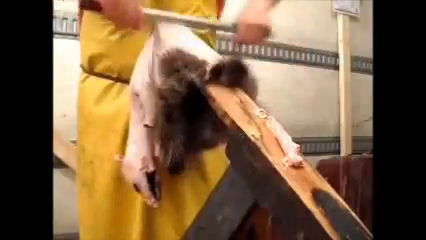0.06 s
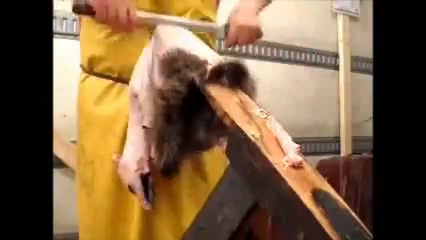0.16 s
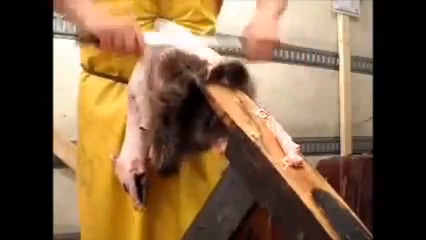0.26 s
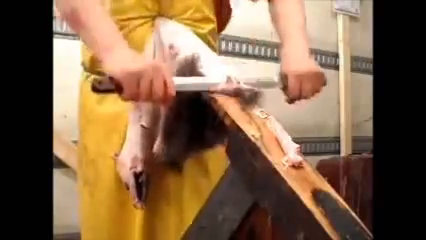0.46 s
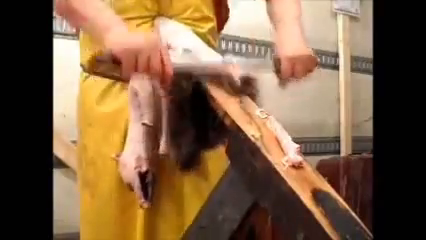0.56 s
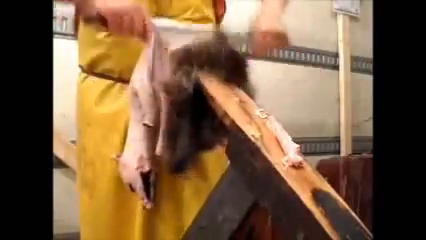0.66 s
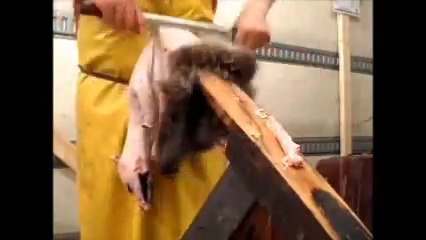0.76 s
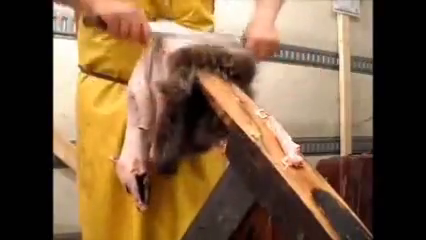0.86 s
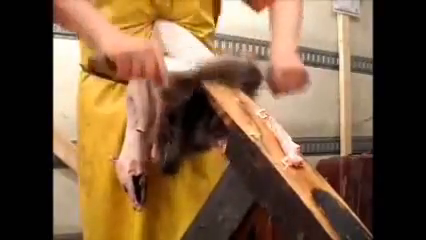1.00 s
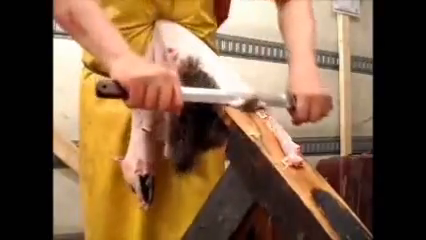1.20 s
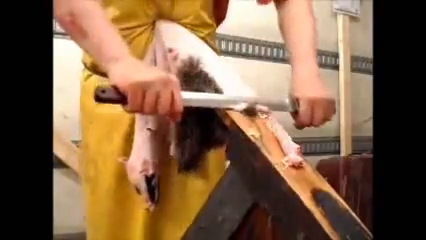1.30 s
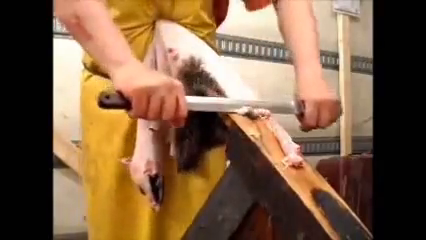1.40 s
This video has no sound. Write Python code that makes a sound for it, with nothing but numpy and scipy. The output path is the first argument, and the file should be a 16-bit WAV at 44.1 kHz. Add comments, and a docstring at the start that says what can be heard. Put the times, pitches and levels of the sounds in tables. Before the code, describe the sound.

Two gritty scrapes of a blade pushed along wet animal hide, with padded bumps on the wooden beam beneath. The second is softer and ends in tiny squelches. The sound is fairly close, in a quiet, slightly echoing workroom.

```python
"""Fleshing a wet hide

A two-handled knife is pushed twice down a hide on a wooden beam, the first time harder. The edge
catches and slips in dense tiny jerks that ring blade and beam and tear the membrane with a hiss.
It bumps over lumps, fat crackles, the stand booms. A bare workshop answers over faint air and whine."""
import sys
import numpy as np
from scipy import signal
from scipy.fft import rfft, irfft, next_fast_len
from scipy.io import wavfile
from scipy.ndimage import map_coordinates

SR = 44100
rng = np.random.default_rng(int(sys.argv[2]) if len(sys.argv) > 2 else 0)


def transcribe(signal):
    """Save signal, clipped to [-1, 1], as a 16-bit WAV file at the path in sys.argv[1]."""
    frames = np.atleast_2d(signal).T
    limited = np.clip(frames, -1, 1)
    pcm = np.round(limited * 32767).astype(np.int16)
    wavfile.write(sys.argv[1], SR, pcm)


N = 63945


def amp(db):
    """Decibels to gain."""
    return 10 ** (np.asarray(db) / 20)


def unit(x):
    """Scale to rms 1."""
    return x / np.sqrt(np.mean(x ** 2) + 1e-20)


def along(points, hz):
    """Interpolate (Hz, value) points on a log frequency axis."""
    knots_hz, values = np.transpose(points)
    return np.interp(np.log(hz + 1), np.log(knots_hz + 1), values)


def seconds():
    """Time of every sample."""
    return np.arange(N) / SR


def wobble(knots_per_s):
    """Smooth random curve."""
    return map_coordinates(rng.standard_normal(2048), [seconds() * knots_per_s], mode="wrap")


def swell(centre_s, sigma_s):
    """Gaussian envelope, peak 1."""
    return np.exp(-.5 * ((seconds() - centre_s) / sigma_s) ** 2)


def filtered(x, response):
    """Apply a gain given as a function of Hz."""
    size = next_fast_len(N + SR // 2)
    return irfft(rfft(x, size) * response(np.fft.rfftfreq(size, 1 / SR)), size)[:N]


def coloured(x, colour):
    """Shape x by (Hz, dB) points, then scale to rms 1."""
    return unit(filtered(x, lambda hz: amp(along(colour, hz))))


def ringing(x, modes):
    """Parallel resonances (Hz, width in Hz, dB) of alternating sign."""
    return filtered(x, lambda f: sum(
        (-1) ** k * amp(db) * 1j * f * width_hz / (hz * hz - f * f + 1j * f * width_hz)
        for k, (hz, width_hz, db) in enumerate(modes)))


def slips(rate_per_s=3500, spread_db=2):
    """Tiny jerks of the edge, random in time and size."""
    happens = rng.random(N) < rate_per_s / SR
    size = amp(spread_db * np.minimum(rng.exponential(size=N), 4))
    return unit(happens * size * rng.choice([-1, 1], N))


def clumps(events, colour, sigma_s):
    """Brief swells of slips at (s, dB) events."""
    envelope = sum(amp(db) * swell(at_s, sigma_s) for at_s, db in events)
    return envelope * coloured(slips(), colour)


def background(air_db=-60, whine_hz=9882, drift_hz=22, whine_db=-70.5, flutter_db=2.5):
    """Steady air noise, a faint hum and a thin electrical whine."""
    # Air spectrum. Each row: frequency in Hz, relative level in dB.
    air_colour = [(25, 3), (80, -2.5), (150, -6), (260, -9), (620, -6), (1050, -8), (1900, -11),
                  (3300, -13.5), (4600, -16), (7000, -19), (10300, -22)]
    # Hum. Each row: frequency in Hz, level in dB.
    hum_tones = [(597.5, -78.5), (1491, -76)]
    t = seconds()
    whine = np.sqrt(2) * np.sin(2 * np.pi * np.cumsum(whine_hz + drift_hz * wobble(110)) / SR)
    hum = sum(amp(db) * np.sqrt(2) * np.sin(2 * np.pi * hz * t + .5 * wobble(3.6))
              for hz, db in hum_tones)
    air = amp(air_db) * coloured(rng.standard_normal(N), air_colour)
    return air + amp(whine_db + flutter_db * wobble(36)) * whine + hum


def rustle(level_db=-63, end_s=0.16, fade_s=0.02):
    """The blade slides lightly back up the hide before the first push."""
    # Rustle spectrum. Each row: frequency in Hz, relative level in dB.
    colour = [(300, 0), (700, -4), (1700, -1.5), (3500, -7.5), (4400, -2.5), (7000, -18)]
    fade = np.clip((end_s - seconds()) / fade_s, 0, 1)
    return amp(level_db) * fade * coloured(slips(), colour)


def booms(jitter_rad=0.13):
    """The stand booms softly as the weight shifts."""
    # Booms. Each row: start in seconds, length in seconds, pitch in Hz, level in dB.
    shifts = [(-.06, 0.15, 74.6, -61), (0.354, .21, 81, -52.5), (0.947, 0.286, 78.8, -59),
              (1.13, 0.17, 58, -58)]
    t = seconds()
    out = np.zeros(N)
    for start_s, length_s, hz, db in shifts:
        arch = np.sin(np.pi * np.clip((t - start_s) / length_s, 0, 1))
        out += amp(db) * np.sqrt(2) * arch * np.sin(2 * np.pi * hz * t + jitter_rad * wobble(33))
    return out


def touches():
    """The blade touches the hide lightly."""
    # Touches. Each row: centre in seconds, level in dB.
    contacts = [(.112, -51), (.123, -50), (1.424, -60)]
    # Touch spectrum. Each row: frequency in Hz, relative level in dB.
    colour = [(100, -16), (600, 1.5), (1700, -6), (3000, -15), (8000, -31)]
    return clumps(contacts, colour, sigma_s=0.0016)


def stroke(levels, rumble_db, attack_db_per_s=395.5, release_db_per_s=237):
    """One push: chattering slips rumble, scrape, rasp and hiss, and ring beam and blade."""
    # Spectra of the padded beam's rumble and the edge's scrape, rasp and hiss.
    # Each row: frequency in Hz, relative level in dB.
    rumble = [(25, -27), (55, -8.5), (105, 1), (145, 0.5), (175, -5), (205, 0), (300, -11), (600, -56)]
    scrape = [(30, -53), (70, -27), (110, -10.5), (170, -14.5), (300, -4), (620, 2), (950, -2.5),
              (1300, -23), (2500, -30)]
    rasp = [(500, -50), (1000, 2.5), (1300, -1.5), (1470, -1), (1700, 2), (2050, 3), (2350, -3.5),
            (2800, -8), (3600, -16.5), (6000, -37)]
    hiss = [(1500, -39), (2900, 4.5), (3600, 3), (4050, 4), (4650, 0.5), (5250, 4), (6000, -2), (7300, -4),
            (8800, -6.5), (10400, -8.5)]
    # Beam and blade modes. Each row: frequency in Hz, width in Hz, relative dB in push 0, in push 1.
    beam = [(263, 18, -14, -5.5), (330.6, 16.5, -6, -9), (423, 81, -9, 0), (511.2, 32, -2, -6),
            (616.4, 14.7, 5, 0.5), (695.7, 17, 0, 1), (799, 30, 1.5, 0), (912, 29, -3, -2)]
    blade = [(1140, 42, -3.5, -1), (1237, 57, -9, 5), (1338, 26, 5.5, 0), (1843, 28, 2, 1.5),
             (1930, 37, 0.5, -3), (2049, 25, -7, -14), (2210, 31, -4, -2), (2456, 19, 1, -4.5),
             (2720, 70, -6.5, -4.5)]
    scrape_db, rasp_db, hiss_db, beam_db, blade_db = -5, -3.5, -.5, -2.5, -5.5
    chatter_db, chatter_per_s = 1, 130
    push, rows = levels
    t = seconds()
    times_s, *curves_db = np.transpose(rows)
    fade_db = attack_db_per_s * np.maximum(times_s[0] - t, 0)
    fade_db += release_db_per_s * np.maximum(t - times_s[-1], 0)
    chatter = unit(amp(chatter_db * wobble(chatter_per_s)))
    low, mid, high = [amp(np.interp(t, times_s, db) - fade_db) * chatter for db in curves_db]
    layers = ((rumble, low, rumble_db), (scrape, low, scrape_db),
              (rasp, mid, rasp_db), (hiss, high, hiss_db))
    out = sum(amp(db) * force * coloured(slips(), colour) for colour, force, db in layers)
    for body, force, db in (beam, low, beam_db), (blade, mid, blade_db):
        modes = [(hz, width_hz, gains_db[push]) for hz, width_hz, *gains_db in body]
        jerks = slips()
        out += amp(db) * ringing(force * jerks, modes) / np.std(ringing(jerks, modes))
    return out


def catches(sigma_s=0.0052, jitter_hz=108):
    """The edge catches hard: brief gritty creaks of nearly regular stick and slip."""
    # Creaks. Each row: centre in seconds, level in dB, pitch in Hz.
    creaks = [(.214, -41, 1810), (0.238, -35, 800), (.302, -28, 1900), (0.344, -30, 2160),
              (.357, -27.5, 1162), (0.378, -28.5, 664.5), (1.031, -38, 1280), (1.045, -46, 1290),
              (1.082, -65, 1296), (1.085, -42.5, 2020)]
    out = np.zeros(N)
    for at_s, db, hz in creaks:
        phase = 2 * np.pi * np.cumsum(hz + jitter_hz * wobble(700)) / SR
        out += amp(db) * np.sqrt(2) * swell(at_s, sigma_s) * np.sin(phase)
    return out


def bumps(attack_s=0.0014, knock_t60_s=0.046, thud_hz=118, thud_db=-16, thud_t60_s=0.19):
    """The edge rides over lumps: padded knocks on the beam, each with a low thud."""
    # Lumps. Each row: start in seconds, level in dB, knock pitch in Hz.
    lumps = [(.289, -19.5, 302), (.921, -23.5, 246), (.927, -27, 281), (.958, -25, 506), (.986, -26.5, 424)]
    out = np.zeros(N)
    for start_s, db, hz in lumps:
        age_s = np.maximum(seconds() - start_s, 0)
        knock = amp(-60 * age_s / knock_t60_s) * np.sin(2 * np.pi * hz * age_s)
        thud = amp(thud_db - 60 * age_s / thud_t60_s) * np.sin(2 * np.pi * thud_hz * age_s)
        out += amp(db) * (1 - np.exp(-age_s / attack_s)) * (knock + thud)
    return out


def snaps(gain_db=-7, t60_s=0.0056):
    """Short wet cracks of tissue letting go."""
    # Cracks. Each row: start in seconds, relative level in dB.
    cracks = [(0.345, -8), (0.381, -35), (1.153, -27.5), (1.167, -23)]
    # Crack spectrum. Each row: frequency in Hz, relative level in dB.
    colour = [(100, -25), (700, 15.5), (2000, 11.5), (4500, 0.5), (10000, -17)]
    t = seconds()
    envelope = sum((t >= at_s) * amp(db - 60 * np.abs(t - at_s) / t60_s) for at_s, db in cracks)
    return amp(gain_db) * envelope * coloured(rng.standard_normal(N), colour)


def squelches():
    """The hide peels off the blade in small squelches."""
    # Squelches. Each row: centre in seconds, level in dB.
    peels = [(1.214, -50), (1.257, -52), (1.286, -51.5), (1.322, -55), (1.340, -53)]
    # Squelch spectrum. Each row: frequency in Hz, relative level in dB.
    colour = [(200, -16), (700, -2.5), (1500, -2), (2300, -3.5), (3300, -7), (5200, -2), (7000, -9.5),
              (10000, -14.5)]
    return clumps(peels, colour, sigma_s=0.0053)


def workshop(x):
    """Room tail, each frequency dying at its own rate."""
    # Room decay. Each row: frequency in Hz, T60 in seconds.
    decay = [(100, 0.68), (300, 0.54), (680, 0.61), (1350, 0.32), (2150, 0.6), (3300, 0.54), (5200, 0.69),
             (10000, 0.31)]
    hz, t, noise = signal.stft(rng.standard_normal(SR), SR, nperseg=256)
    t60_s = along(decay, hz)[:, None]
    decaying = noise * amp(-60 * t / t60_s) / np.sqrt(t60_s / t60_s.mean())
    tail = signal.istft(decaying, SR, nperseg=256)[1]
    response = np.pad(tail, (SR // 200, 0)) / np.linalg.norm(tail)  # 5 ms pre-delay
    return signal.fftconvolve(x, response)[:N]


def scene(direct_db=-2.5, room_db=-4.5):
    """Two pushes and their small sounds in the room; booms, rustle and background stay dry."""
    # Force curves of the pushes. Each row: time in seconds, then relative dB of the
    # low (rumble, scrape, beam), mid (rasp, blade) and high (hiss) drive.
    first = [(0.175, -63, -60, -65), (0.213, -37.5, -39, -59), (0.233, -38.5, -35.5, -43),
             (0.279, -33, -39.5, -48.5), (0.303, -33, -25.5, -40.5), (0.327, -33, -33.5, -41),
             (0.345, -29.5, -31, -40.5), (0.357, -25.5, -34.5, -39.5), (0.373, -29, -39, -43),
             (0.44, -39.5, -46, -46.5)]
    second = [(0.865, -45.5, -48.5, -54.5), (0.871, -45, -47, -52), (0.947, -39.5, -37, -50.5),
              (0.959, -41.5, -44, -47), (0.999, -42.5, -41, -46.5), (1.025, -37.5, -38, -47),
              (1.077, -44, -40.5, -45), (1.117, -50, -53.5, -51.5), (1.221, -65, -62.5, -65),
              (1.225, -89, -63, -65)]
    small = bumps() + catches() + snaps() + squelches() + touches()
    sources = [stroke((0, first), rumble_db=-17.5), stroke((1, second), rumble_db=-11.5), small]
    work = sum(amp(direct_db) * x + amp(room_db) * workshop(x) for x in sources)
    return (work + booms() + rustle() + background())[None]


def record(dry, low_cut_hz=45, top_hz=10450):
    """Second-order low cut and a very steep top limit."""
    def response(hz):
        low_cut = hz ** 2 / np.hypot(hz ** 2, low_cut_hz ** 2)
        return low_cut / (1 + (hz / top_hz) ** 200)
    return filtered(dry[0], response)[None]


dry = scene()
out = record(dry)
transcribe(out)
```